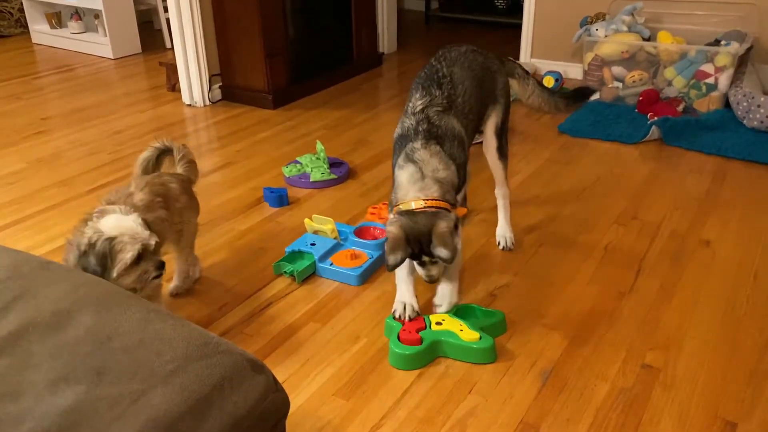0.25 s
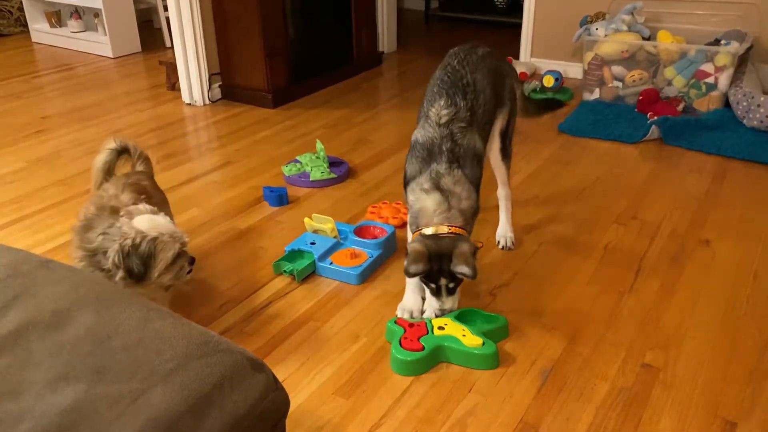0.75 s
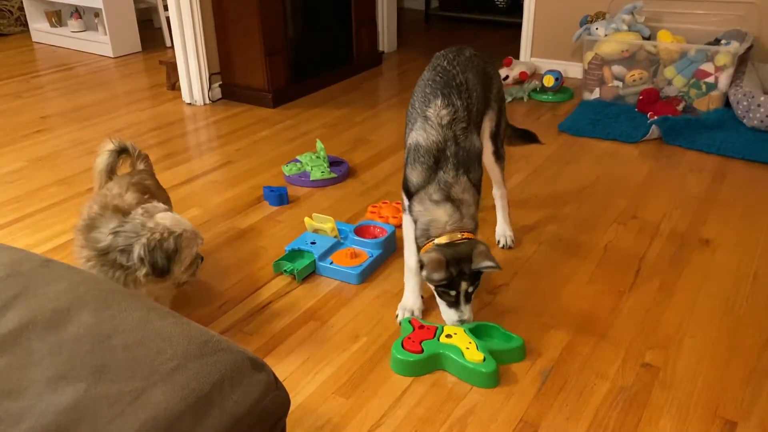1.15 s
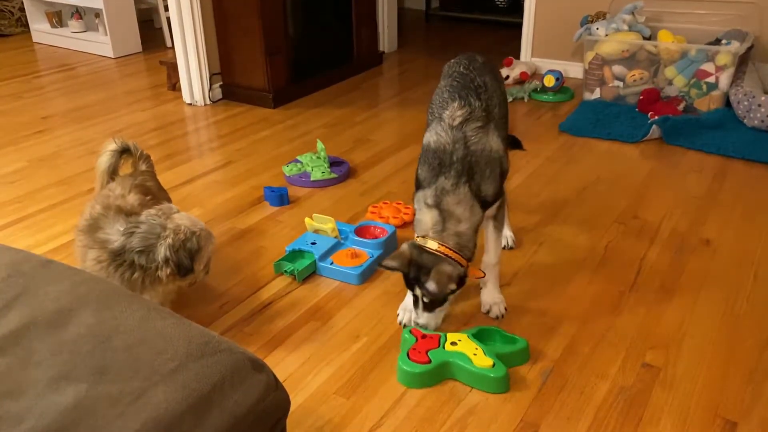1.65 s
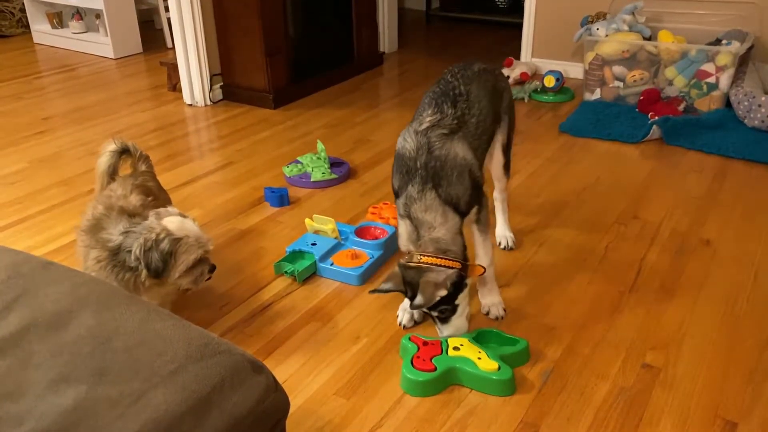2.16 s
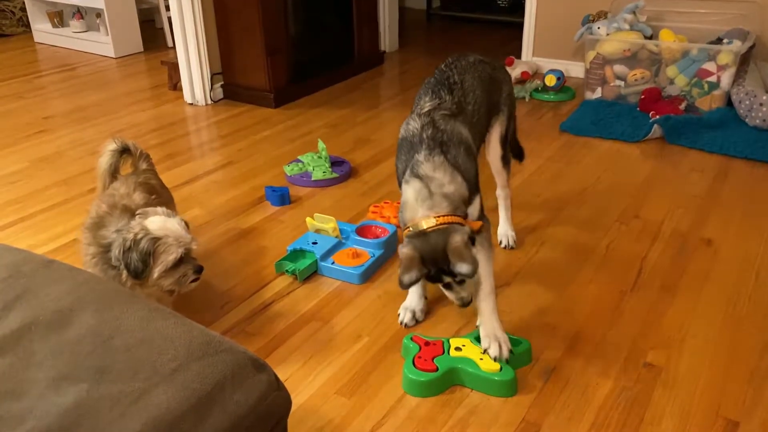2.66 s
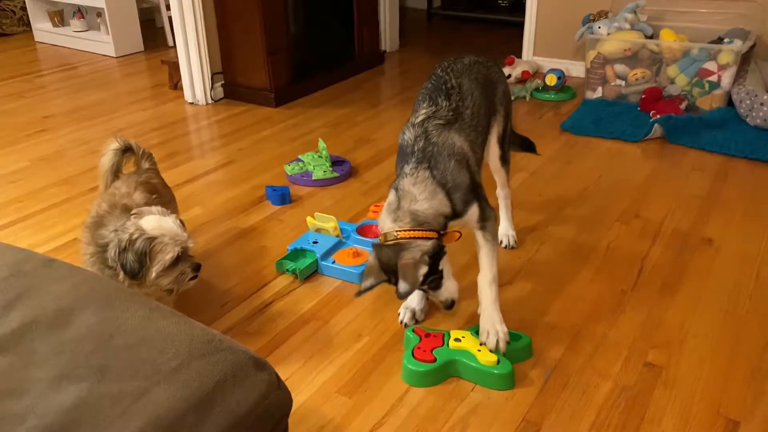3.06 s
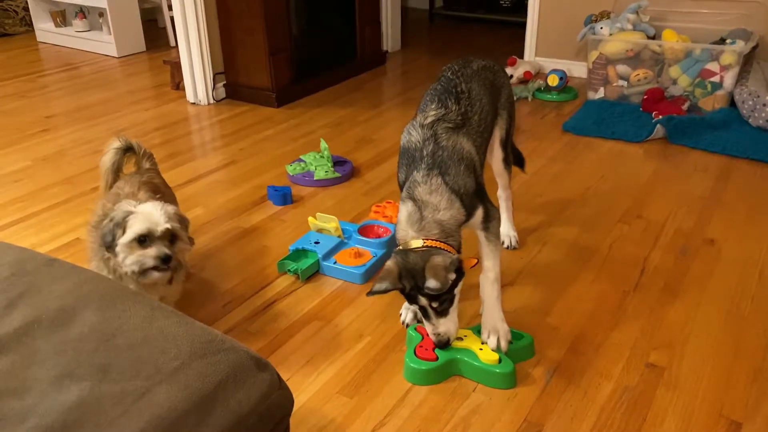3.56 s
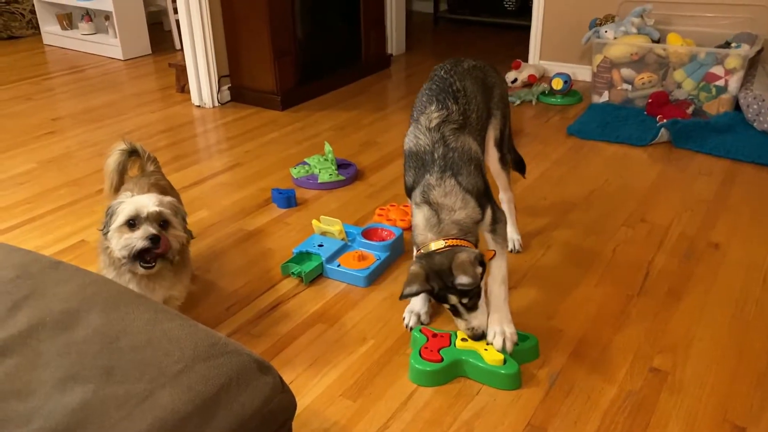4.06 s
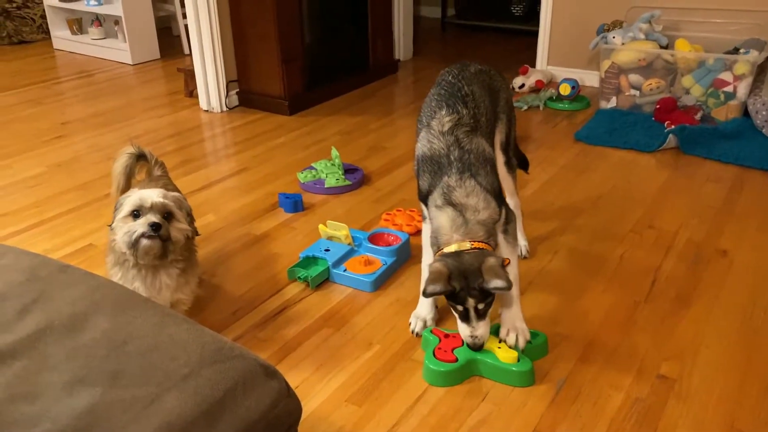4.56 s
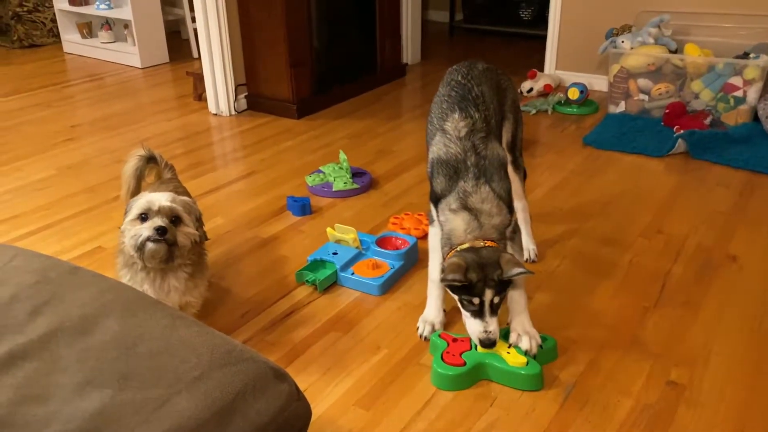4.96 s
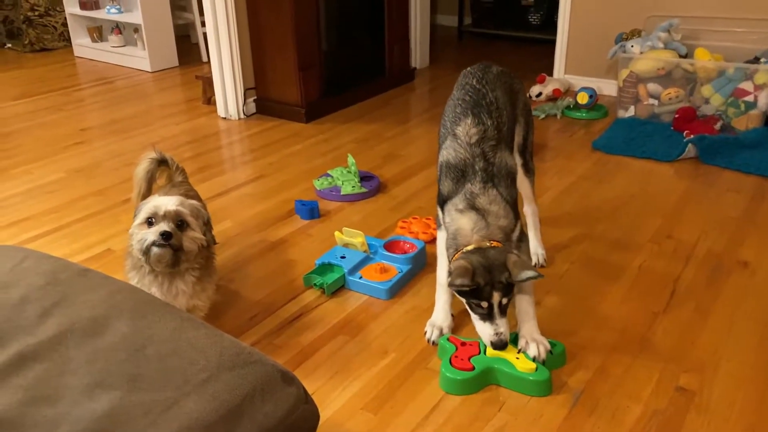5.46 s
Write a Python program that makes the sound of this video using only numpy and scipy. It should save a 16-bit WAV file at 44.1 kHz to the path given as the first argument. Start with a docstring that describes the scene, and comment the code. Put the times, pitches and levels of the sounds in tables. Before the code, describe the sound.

In a quiet living room, a hollow plastic toy clatters loudly under a dog's paws, its lids chattering and the wooden floor thudding. The flurry soon gives way to faint sniffs and occasional soft taps. A few stronger knocks come near the middle, followed by more nudging, snuffling and tiny wet ticks. A small stereo microphone hears it slightly left of centre, with a short room echo.

```python
"""Dog at a puzzle toy

A dog paws and noses a hollow plastic toy on a hardwood floor in a quiet living room. Each blow rings
the shell and sets the loose lids chattering, paws thud on the boards, the nose snuffles and drags over
the plastic, and tongue and claws tick. The room rings for half a second around a small stereo mic."""
import sys
import numpy as np
from scipy import signal
from scipy.fft import rfft, irfft, next_fast_len
from scipy.io import wavfile
from scipy.ndimage import uniform_filter1d

SR = 44100
rng = np.random.default_rng(int(sys.argv[2]) if len(sys.argv) > 2 else 0)


def to_wav(s):
    """Save 16-bit WAV."""
    ch = np.atleast_2d(s).T  # columns
    pcm = np.round(np.clip(ch, -1, 1) * 32767)  # PCM
    wavfile.write(sys.argv[1], SR, pcm.astype(np.int16))


N = 251811


def gain_of(db):
    """Decibels to gain."""
    return 10 ** (np.asarray(db) / 20)


def curve_at(points, hz):
    """Reads a curve on a log-frequency axis."""
    point_hz, value = np.transpose(points)
    return np.interp(np.log(hz + 1), np.log(point_hz + 1), value)


def equalise(x, gain):
    """Multiplies the spectrum of x by gain(hz)."""
    return irfft(rfft(x) * gain(np.fft.rfftfreq(x.shape[-1], 1 / SR)), x.shape[-1])


def unit_rms(x):
    """Scales to rms 1."""
    return x / np.sqrt(np.mean(x ** 2) + 1e-20)


def add(mix, start, sound):
    """Mixes a sound in at a start time in seconds."""
    part = mix[..., max(round(start * SR), 0):][..., :sound.shape[-1]]
    part += sound[..., :part.shape[-1]]


def ring(modes, seconds, spread_db, rise_s):
    """One blow on a set of modes, at peak 1; each lands elsewhere, so the modes share it differently."""
    hz, db, t60 = np.transpose(modes)[..., None]
    t = np.arange(round(seconds * SR)) / SR
    detune, strength = rng.standard_normal((2,) + hz.shape)
    sign = (-1.) ** np.arange(len(modes))[:, None]  # neighbours swing opposite, filling the gaps between
    waves = sign * np.sin(2 * np.pi * hz * (1 + .035 * detune) * t)
    decays = gain_of(db + spread_db * strength - 60 * t / t60)
    blow = (decays * waves).sum(0) * (1 - np.exp(-t / rise_s))
    return blow / np.max(abs(blow))


def favour(modes, pitch_hz, db_per_octave):
    """The place of a blow favours the modes near one pitch."""
    return [(hz, db - db_per_octave * abs(np.log2(hz / pitch_hz)), t60) for hz, db, t60 in modes]


# Stereo image of diffuse sound. Each row: frequency in Hz, left-right likeness from 0 to 1.
STEREO_LIKENESS = [(30, .93), (200, .85), (500, 0.48), (1200, .1), (3000, 0.19), (6000, 0.077)]


def diffuse(pair):
    """Blends two unrelated signals into a left and right that agree in the bass."""
    mid = equalise(pair[0], lambda hz: np.sqrt((1 + curve_at(STEREO_LIKENESS, hz)) / 2))
    side = equalise(pair[1], lambda hz: np.sqrt((1 - curve_at(STEREO_LIKENESS, hz)) / 2))
    return np.array([mid + side, mid - side])


# EQ of the quiet room. Each row: frequency in Hz, relative level in dB.
ROOM_TONE_EQ = [(12, -36), (20, -24), (59, 3), (167, -11), (215, -9.5), (234, -6.5), (336, -17.5),
                (556, -24), (1320, -33.5), (2070, -37), (3140, -34.5), (4280, -42), (15900, -51)]


def room_tone():
    """A steady bed of noise, heavy in the bass."""
    noise = diffuse(rng.standard_normal((2, N)))
    return gain_of(-65.5) * unit_rms(equalise(noise, lambda hz: gain_of(curve_at(ROOM_TONE_EQ, hz))))


# Modes of the hollow shell, the lids and the contact crack.
# Each row: pitch in Hz, relative level in dB, free ring time (t60) in seconds.
SHELL_MODES = [(400, -9, .016), (480, -10, .016), (560, -8, .016), (640, -4, .02), (745, 0, .022),
               (815, 0, .022), (930, 0, .02), (1055, -3, .018), (1190, -3, .016), (1330, -6, .014)]
LID_MODES = [(1394, 3.5, 0.0065), (2000, -0.5, 0.0096), (2125.5, -6, 0.016), (2426, -4, 0.012),
             (2960, -9, 0.019), (3280, -4.5, 0.01)]
CRACK_MODES = [(3700, 0, .0022), (4600, -2, .0022), (5700, -4, .002), (6900, -5, .0018), (8300, -6, .0016),
               (9900, -7, .0014), (11700, -8, .0012), (13600, -9, .0012), (15500, -10, .0012)]
# Blows on the toy. Each row: start in seconds, shell, lid and crack levels in dB,
# favoured pitch of the shell in Hz.
KNOCKS = [(0.0, -19, -10.5, -11.5, 840), (0.008, -24.5, -18.5, -18, 1040), (0.063, -24.5, -13, -29, 850),
          (0.073, -22.5, -31, -12, 660), (0.085, -15.5, -40, -24, 1050), (0.106, -21, -27, -24, 726),
          (0.153, -23.5, -17.5, -32, 740), (0.166, -21, -24, -35, 790), (0.204, -40, -39, -38.5, 820),
          (0.3, -32, -14, -16.5, 850), (0.307, -23, -16.5, -20.5, 977), (0.391, -28, -24, -28, 741),
          (0.444, -33.5, -34, -25.5, 1030), (0.453, -56, -60, -29, 797), (0.459, -25.5, -18.5, -17, 1007),
          (0.478, -14.5, -14, -20, 950), (0.496, -30, -30, -24.5, 1192), (0.513, -19.5, -48, -31, 947),
          (0.534, -34, -23, -32.5, 935), (0.583, -21.5, -18.5, -28.5, 980),
          (0.604, -28.5, -51, -57.5, 1070), (1.095, -53.5, -53, -71, 1210), (1.129, -53, -52.5, -64.5, 970),
          (1.31, -60, -70.5, -81, 902), (1.661, -42, -39.5, -60, 836), (1.689, -36, -45.5, -74.5, 782),
          (1.756, -41, -47.5, -55.5, 840), (2.262, -49.5, -56, -79.5, 735),
          (2.309, -66.5, -70.5, -53.5, 744), (2.481, -24.5, -26, -24.5, 487), (2.49, -33, -47, -42, 440),
          (2.572, -40.5, -39.5, -35, 856), (2.691, -47, -49, -55, 870), (2.716, -45.5, -42.5, -58, 953),
          (2.761, -35, -29, -32, 600), (2.766, -34, -29, -35, 680), (2.773, -37, -51, -60, 795),
          (2.936, -47.5, -53, -81, 960), (2.969, -44, -40.5, -53, 785), (3.009, -48, -70, -77, 910),
          (3.095, -64, -50.5, -50.5, 1184), (3.185, -59.5, -53, -70.5, 940),
          (3.915, -63, -65.5, -82.5, 900), (3.998, -54, -63.5, -68, 740), (4.195, -43, -47.5, -71, 1120),
          (4.209, -45, -82, -80, 1220), (4.293, -50, -47.5, -78, 960), (4.329, -53.5, -82, -68, 1180),
          (4.484, -44.5, -46, -45, 900), (4.671, -51, -52, -50, 920), (4.63, -66, -65, -68, 894),
          (4.695, -35, -33.5, -40.5, 644), (4.718, -44, -38, -43, 900), (4.722, -35.5, -41, -63, 640),
          (4.876, -50.5, -66, -57, 618), (5.009, -50.5, -73, -84.5, 1080), (5.268, -64, -73.5, -70.5, 740),
          (5.304, -44.5, -40.5, -48.5, 684), (5.313, -53, -64, -75, 628), (5.415, -43, -57.5, -78, 723),
          (5.463, -50.5, -50.5, -78.5, 790)]
SOFT_TO_HARD_DB = [-59, -23.5]  # crack level of a soft and of a hard blow
SHELL_DAMPING = 1.096  # the paw or nose on the shell shortens its ring by this factor


def toy_clacks():
    """Every blow rings shell and lids and cracks at the contact; harder ones ring higher and wider."""
    out = np.zeros(N)
    damped_shell = [(hz, db, t60 / SHELL_DAMPING) for hz, db, t60 in SHELL_MODES]
    for start, shell_db, lids_db, crack_db, shell_hz in KNOCKS:
        lids_hz = np.interp(crack_db, SOFT_TO_HARD_DB, [1420, 2070])
        slope = np.interp(crack_db, SOFT_TO_HARD_DB, [17, 6])
        shell = favour(damped_shell, shell_hz, db_per_octave=10.5)
        lids = favour(LID_MODES, lids_hz, db_per_octave=slope)
        crack = favour(CRACK_MODES, pitch_hz=4800, db_per_octave=0.32 * slope)  # soft cracks are duller
        add(out, start, gain_of(shell_db) * ring(shell, 0.036, spread_db=3.5, rise_s=0.0003))
        add(out, start, gain_of(lids_db) * ring(lids, .03, spread_db=2.0, rise_s=0.0001))
        add(out, start, gain_of(crack_db) * ring(crack, .01, spread_db=3.0, rise_s=0.000058))
    return out


def lid_rattle(clicks_per_s=250, t60_s=0.18, spread_db=3.5, lid_count=8):
    """After each blow the loose lids chatter in many small random clicks that die away."""
    out, shake = np.zeros(N), np.zeros(N)
    t = np.arange(SR // 2) / SR
    for start, _, _, crack_db, _ in KNOCKS:
        add(shake, start, gain_of(crack_db - 19.5 - 60 * t / t60_s))
    strength = shake * gain_of(spread_db * rng.standard_normal(N))
    hits = strength * (rng.random(N) < clicks_per_s / SR)
    lid_hit = rng.integers(0, lid_count, N)
    for lid in range(lid_count):
        click = ring(LID_MODES + CRACK_MODES, .015, spread_db=4.0, rise_s=0.000067)
        out += signal.oaconvolve(hits * (lid_hit == lid), click)[:N]
    return out


# Modes of the floor's deep joists and thinner boards.
# Each row: pitch in Hz, relative level in dB, ring time (t60) in seconds.
JOIST_MODES = [(45, -9, .1), (60, -4, .1), (85, 0, .12), (110, -3, .07)]
BOARD_MODES = [(143.5, -8, 0.24), (182, -10.5, 0.27), (210, 0.5, 0.074), (264, 3, 0.024), (272, -2, 0.094),
               (318, -6, 0.13), (380, 1, 0.03), (520, -5, 0.024)]
# Paws and toy landing. Each row: start in seconds, joist and board drive in dB.
THUDS = [(0.009, -36.5, -28.5), (0.102, -36, -25), (0.412, -29.5, -22), (0.501, -56, -24.5),
         (0.732, -33.5, -40), (1.393, -38, -50.5), (1.756, -48.5, -39.5), (2.259, -55, -54.5),
         (2.481, -42, -23.5), (2.5, -38.5, -33.5), (2.769, -49.5, -31.5), (2.996, -76, -48.5),
         (3.189, -57, -49.5), (4.466, -59, -46), (4.72, -73, -38), (5.299, -78, -39), (5.456, -64, -59.5)]


def floor_thuds(contact_s=0.0031):
    """Each push rings the joists and the boards; the soft contact rolls off the high modes."""
    out = np.zeros(N)
    push = np.hanning(round(contact_s * SR) + 3)
    for start, joists_db, boards_db in THUDS:
        joists = gain_of(joists_db) * ring(JOIST_MODES, .3, spread_db=2.0, rise_s=0.00066)
        boards = gain_of(boards_db) * ring(BOARD_MODES, .3, spread_db=0.4, rise_s=.0025)
        add(out, start, np.convolve(joists + boards, push / push.sum()))
    return out


# EQ of the nose's hiss. Each row: frequency in Hz, relative level in dB.
SNUFFLE_EQ = [(250, -9), (800, 9.5), (1500, -2.5), (2400, -1.5), (4000, -12), (5500, -8), (8000, -13.5),
              (11000, -15), (16000, -30)]
# Strokes of the nose. Each row: start of the hold in seconds, hold in seconds, level in dB,
# treble tilt in dB per octave, top pitch of the whistle in Hz.
NOSE_STROKES = [(0.793, .13, -75, -.5, 3620), (1.035, 0.067, -81, -1.2, 5030),
                (1.115, 0.079, -71.5, 3.5, 4120), (1.252, .11, -88.5, -6.5, 1160),
                (1.388, 0.011, -83.5, -2.5, 3400), (1.622, 0.039, -84, -3.5, 6020),
                (1.686, 0.033, -66, -0.5, 3980), (1.754, 0.013, -68.5, 0, 3800),
                (2.091, 0.0095, -77.5, -1.5, 3490), (2.287, 0.024, -73, -1.5, 3664),
                (2.361, 0.027, -76.5, 3, 4700), (2.971, 0.1, -72.5, -0.5, 3470),
                (3.171, .01, -72, -2.8, 3820), (3.359, 0.0076, -76.5, 0.5, 4250),
                (3.787, 0.004, -77.5, 4.5, 5130), (4.135, 0.048, -74.5, 0, 3800),
                (4.227, .11, -79.5, -6, 6020), (4.458, 0.028, -71, 1.5, 4400),
                (4.496, 0.014, -78, -2.5, 4660), (4.664, 0.036, -73, -3, 3860), (4.735, .02, -71, -6, 3770),
                (4.771, 0.18, -72, -2.5, 5530), (5.012, .02, -85.5, -14, 3930),
                (5.334, 0.0066, -79.5, -9, 3680), (5.449, 0.034, -84.5, -14.5, 3520)]
RISE_DB_PER_S, FALL_DB_PER_S = 539, 327


def nose_snuffle(whistle_db=7.5, whistle_octaves=.22):
    """Air hiss with a grain of small slips; each stroke is tilted between dull drag and bright sniff."""
    grain = gain_of(2.5 * unit_rms(uniform_filter1d(rng.standard_normal(N), 130)))
    air = rng.standard_normal(N) * grain
    hiss = unit_rms(equalise(air, lambda hz: gain_of(curve_at(SNUFFLE_EQ, hz))))
    hz, t, bands = signal.stft(hiss, SR, nperseg=256, noverlap=192)
    shape = np.zeros(bands.shape)
    tilt_octaves = np.log2((hz[:, None] + 900) / 4900)  # pivots at 4 kHz, flattens in the bass
    for start, hold, db, tilt, top_hz in NOSE_STROKES:
        fade_in_db = RISE_DB_PER_S * np.maximum(start - t, 0)
        fade_out_db = FALL_DB_PER_S * np.maximum(t - start - hold, 0)
        sag = 12 * np.minimum((t - start - hold / 2) ** 2, .04)  # the whistle is highest mid-stroke
        octaves_off = np.log2((hz[:, None] + 1) / (top_hz * (1 - sag)))
        resonance_db = whistle_db * np.exp(-(octaves_off / whistle_octaves) ** 2)
        shape += gain_of(db - fade_in_db - fade_out_db + tilt * tilt_octaves + resonance_db)
    return signal.istft(bands * shape, SR, nperseg=256, noverlap=192)[1][:N]


# Modes of a tick. Each row: pitch in Hz, relative level in dB, ring time (t60) in seconds.
TICK_MODES = [(7600, 0, 0.0027), (9600, 2, 0.004), (12300, 8.5, 0.0026), (14600, -8, 0.0027)]
# Tiny wet ticks. Each row: start in seconds, level in dB.
TICKS = [(3.7828, -57), (3.959, -56.5), (3.9962, -64), (4.2433, -57.5), (4.2916, -54.5), (4.333, -54.5),
         (5.6131, -66)]


def tongue_and_claw_ticks():
    """Tongue and claw tips make the shortest, brightest contacts."""
    out = np.zeros(N)
    for start, db in TICKS:
        add(out, start, gain_of(db) * ring(TICK_MODES, .01, spread_db=1.5, rise_s=.0001))
    return out


# Decay of the living room. Each row: frequency in Hz, reverb time (t60) in seconds.
REVERB_TIMES = [(100, 0.9), (400, 0.49), (1100, 0.58), (3000, 0.49), (8000, 0.42), (15000, 0.51)]


def room_reverb(send):
    """Three tails of sparse reflections die band by band, fed in turn so that blows ring differently."""
    out, length = np.zeros((2, N)), 40000
    for turn in range(3):
        taps = np.zeros((2, length))
        slots = np.arange(120, length - 20, 20)  # one reflection somewhere in every 20 samples
        arrivals = slots + rng.integers(0, 20, (2, len(slots)))
        np.put_along_axis(taps, arrivals, rng.choice([-1., 1.], arrivals.shape), 1)
        hz, t, bands = signal.stft(diffuse(taps), SR, nperseg=256)
        early = 1 + 1.3 * np.exp(-t / .025)  # floor and furniture close by answer first and strongest
        decay = gain_of(-60 * t / curve_at(REVERB_TIMES, hz)[:, None])
        tail = signal.istft(bands * early * decay, SR, nperseg=256)[1]
        tail /= np.linalg.norm(tail[0])
        crossfade = np.sqrt(2 / 3) * np.cos(np.pi * (np.arange(N) / 9000 + turn / 3))
        out += signal.fftconvolve((send * crossfade)[None], tail, axes=1)[:, :N]
    return out


def scene():
    """Toy and dog a little left of centre and thuds in the middle, over reverb and room tone."""
    toy = toy_clacks() + lid_rattle()
    thuds, nose, ticks = floor_thuds(), nose_snuffle(), tongue_and_claw_ticks()
    direct = (toy + ticks + gain_of(4.0) * nose) * gain_of([[.7], [-.7]])
    send = gain_of(4.13) * toy + gain_of(-1.0) * thuds + gain_of(1) * ticks + gain_of(2.0) * nose
    reverb = gain_of([[.3], [-.3]]) * room_reverb(send)
    return direct + thuds + reverb + room_tone()


def record(dry, crossover_hz=6500, in_phase_hz=6950, lead_s=1 / 4200, cutoff_hz=15950):
    """The right channel takes most of its treble from the left capsule, a bit early; then a low-pass."""
    size = next_fast_len(N + 4096)
    left, right = rfft(dry, size)
    hz = np.fft.rfftfreq(size, 1 / SR)
    share = .88 / (1 + np.exp((crossover_hz - hz) / 250))
    early_left = left * np.exp(2j * np.pi * (hz - in_phase_hz) * lead_s)
    right = np.sqrt(1 - share) * right + np.sqrt(share) * early_left
    stereo = irfft(np.array([left, right]), size)[:, :N]
    low_pass = signal.firwin(511, cutoff_hz, window=("kaiser", 9), fs=SR)
    return signal.oaconvolve(stereo, low_pass[None], "same")


dry = scene()
out = record(dry)
to_wav(out)
```